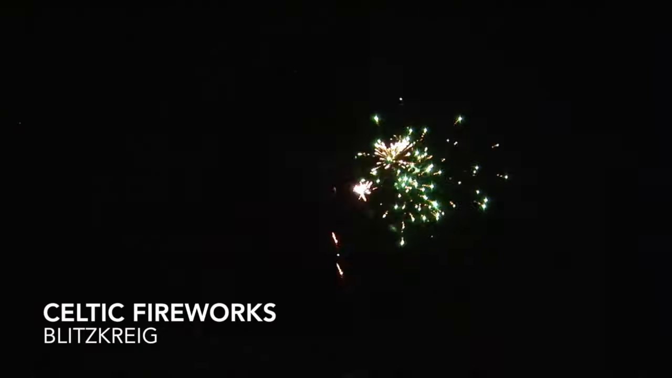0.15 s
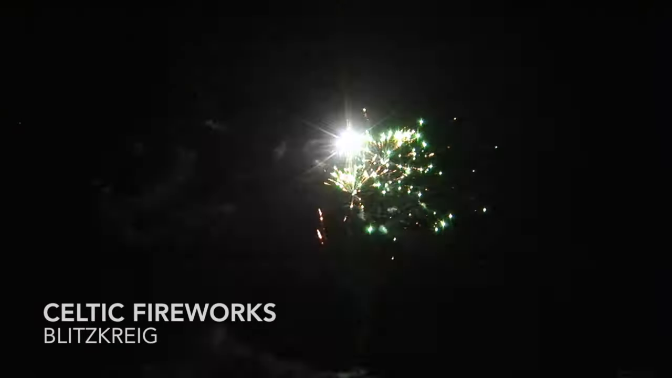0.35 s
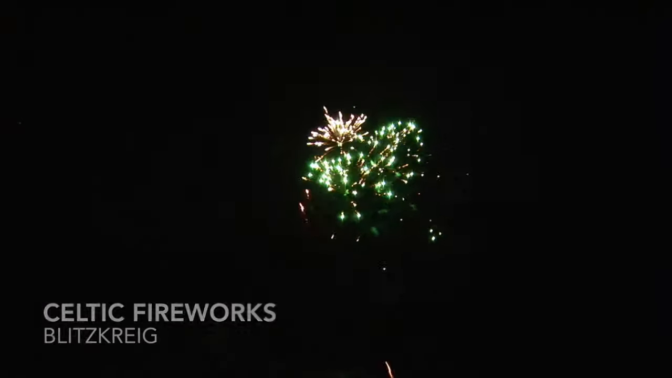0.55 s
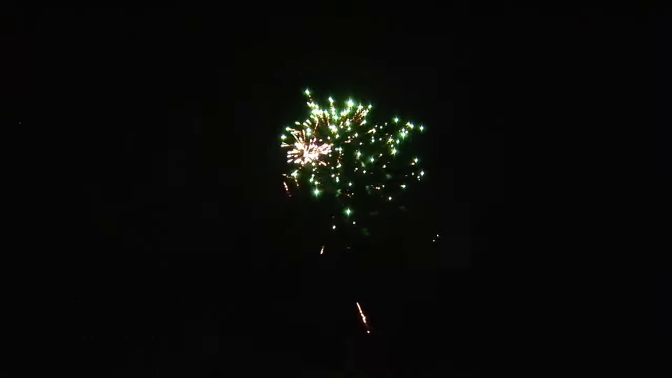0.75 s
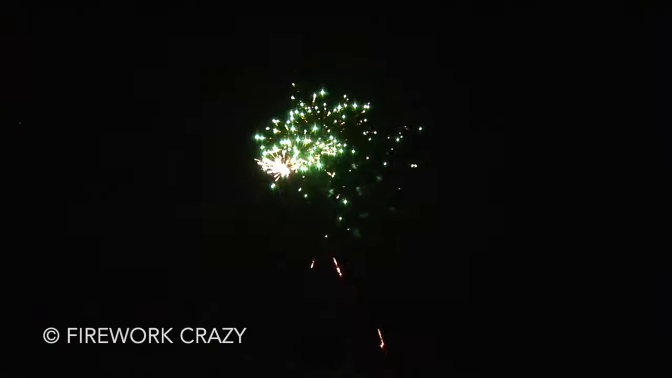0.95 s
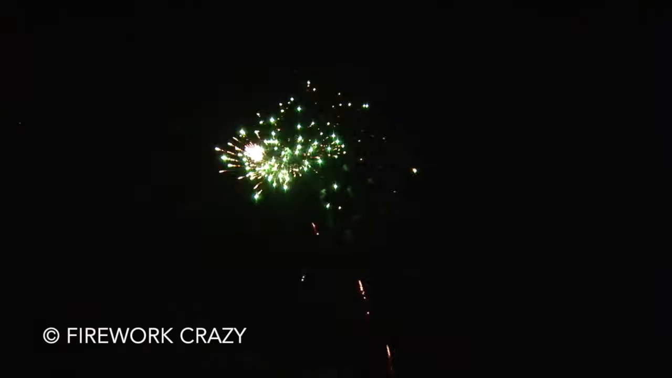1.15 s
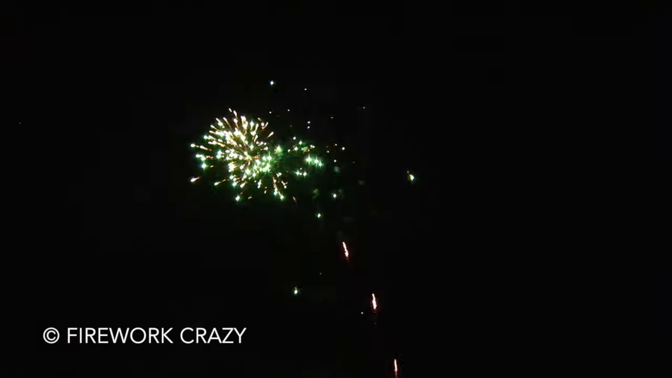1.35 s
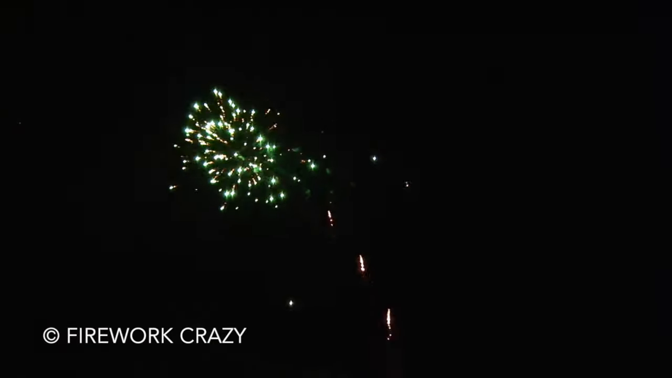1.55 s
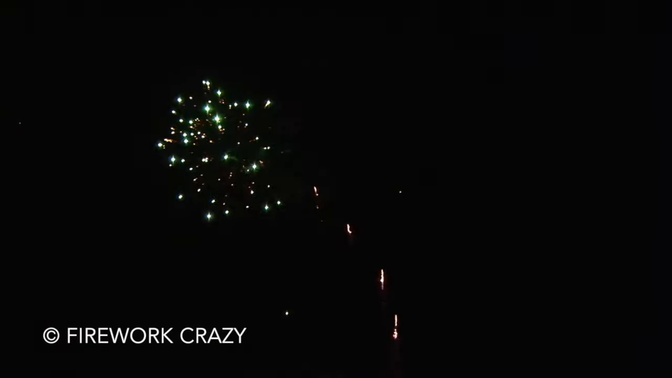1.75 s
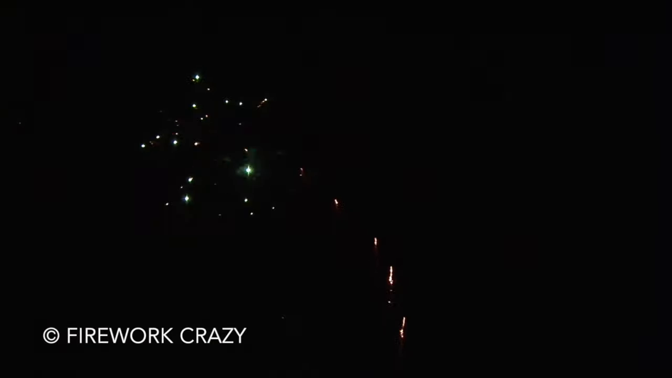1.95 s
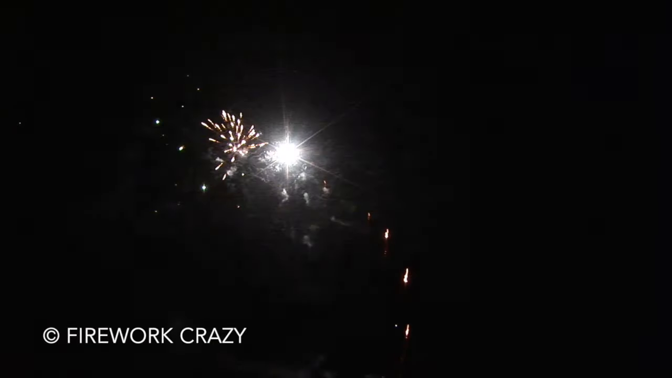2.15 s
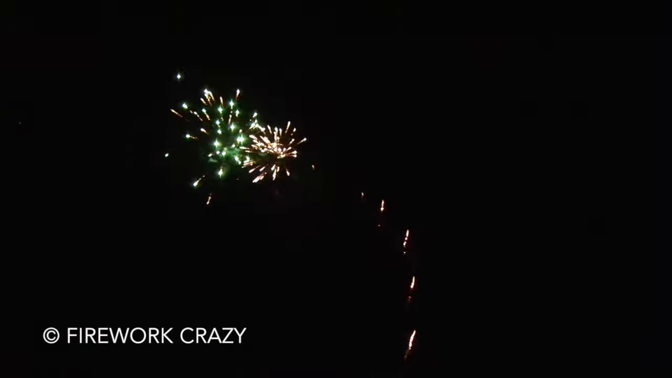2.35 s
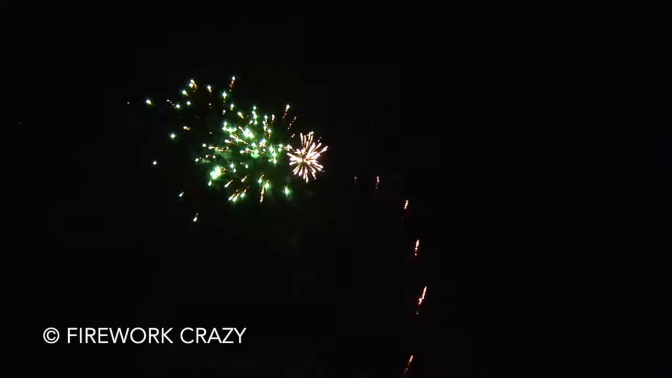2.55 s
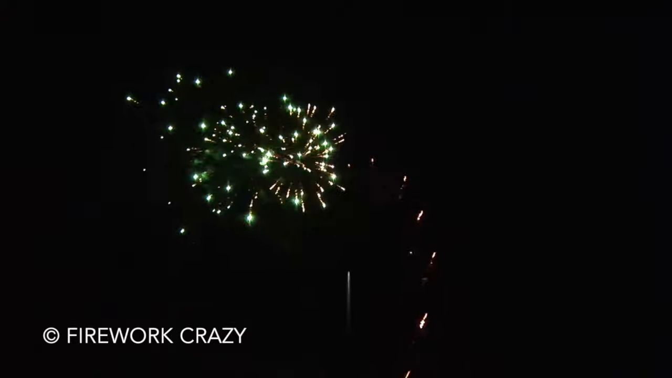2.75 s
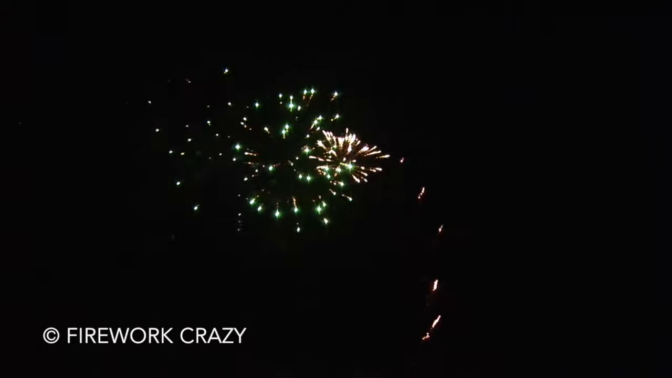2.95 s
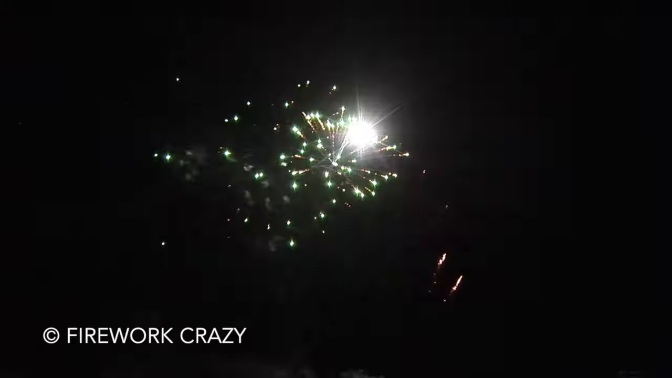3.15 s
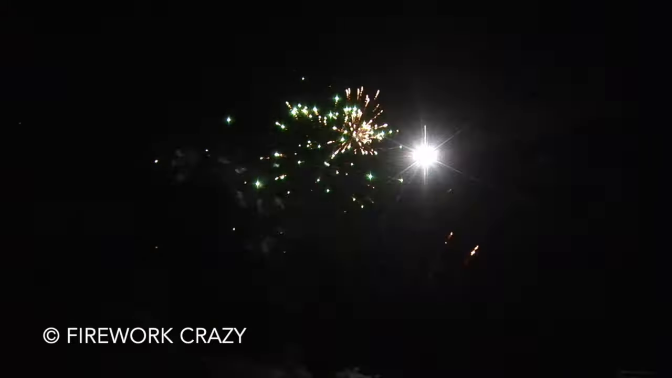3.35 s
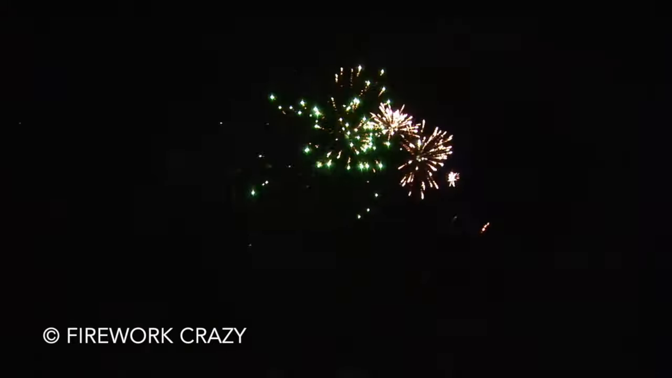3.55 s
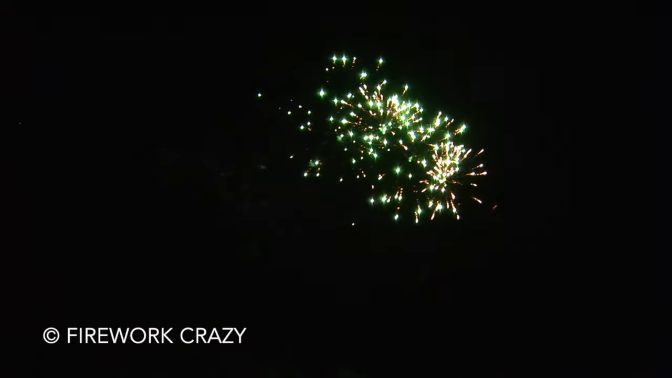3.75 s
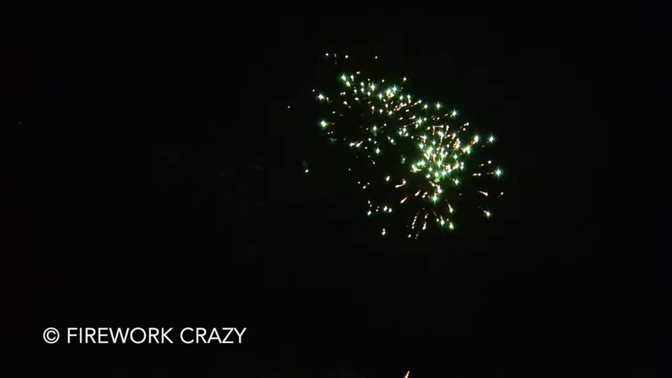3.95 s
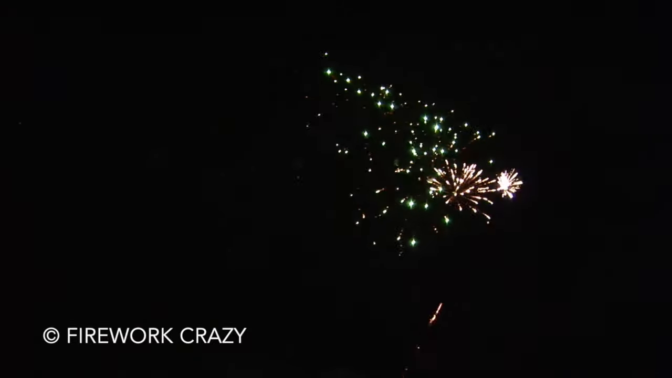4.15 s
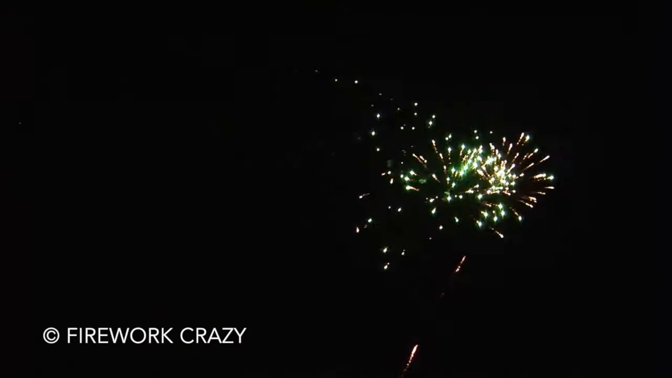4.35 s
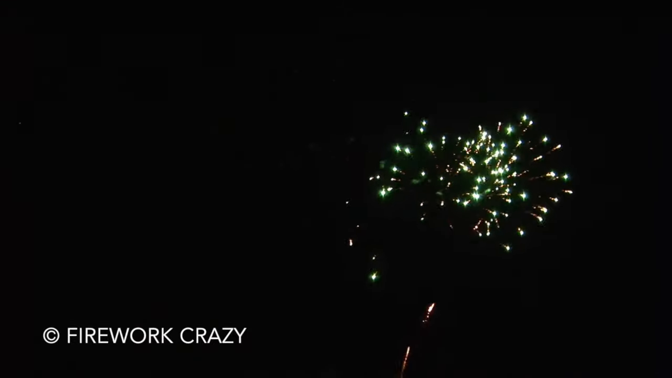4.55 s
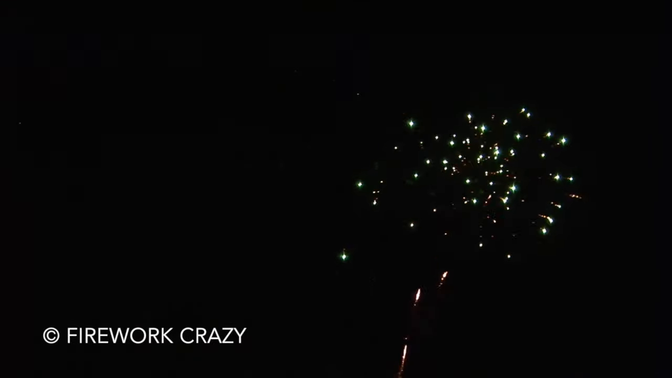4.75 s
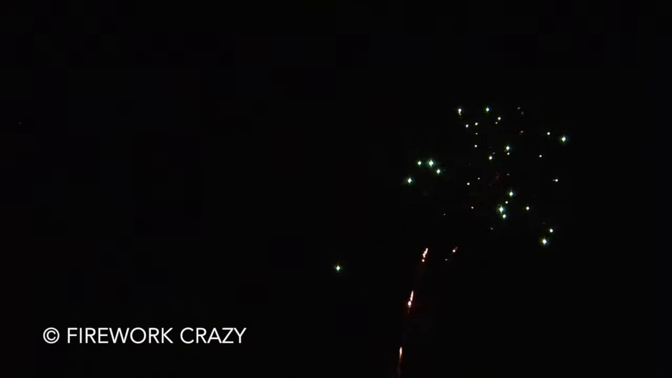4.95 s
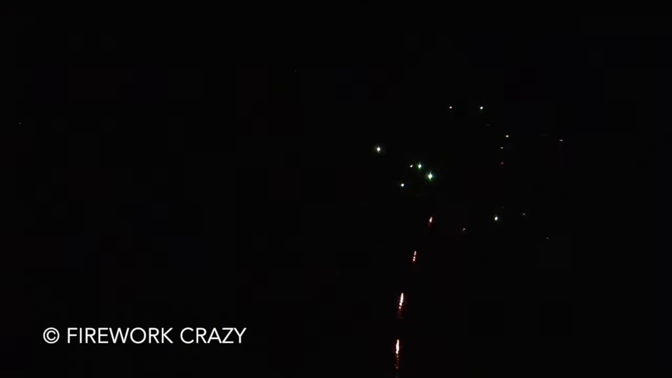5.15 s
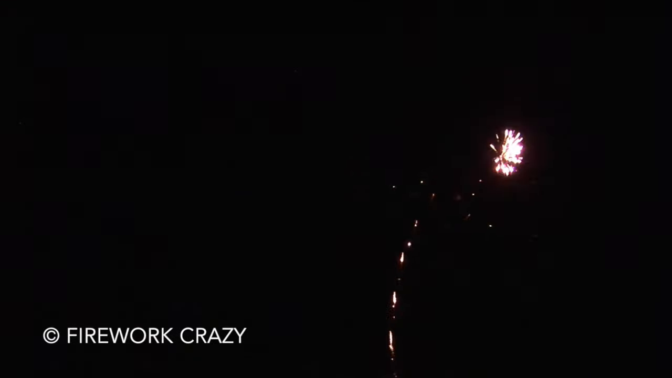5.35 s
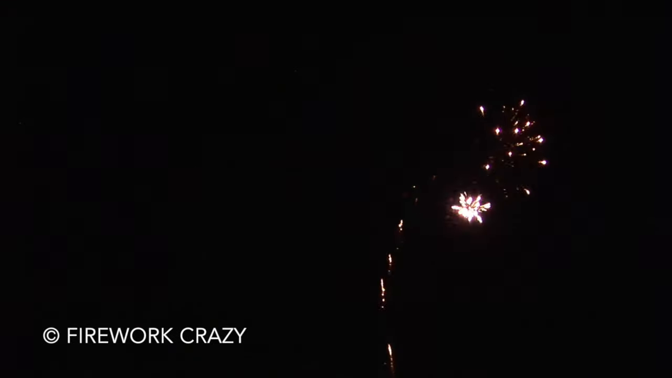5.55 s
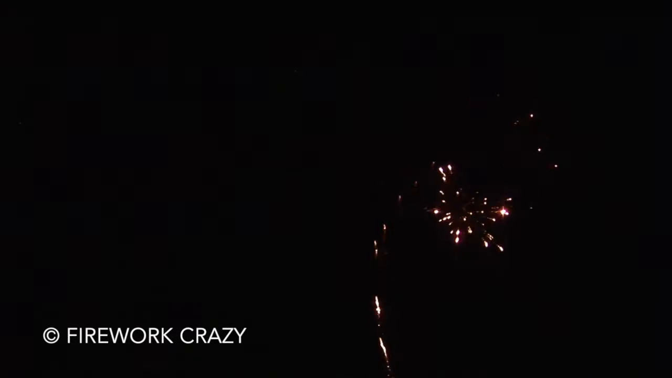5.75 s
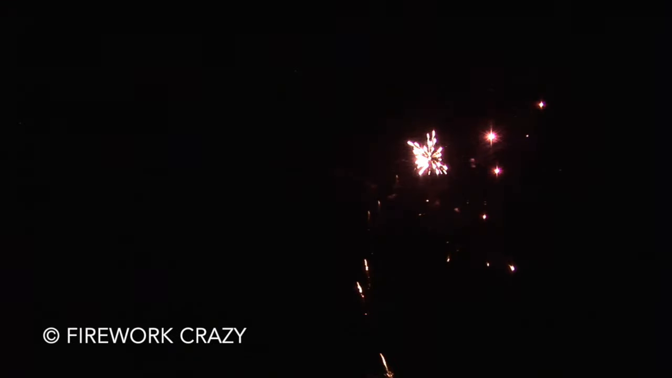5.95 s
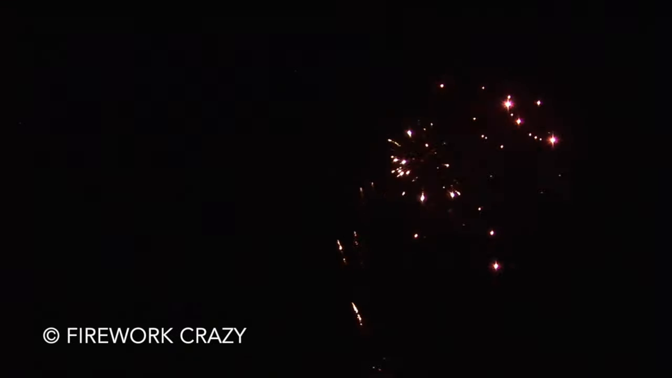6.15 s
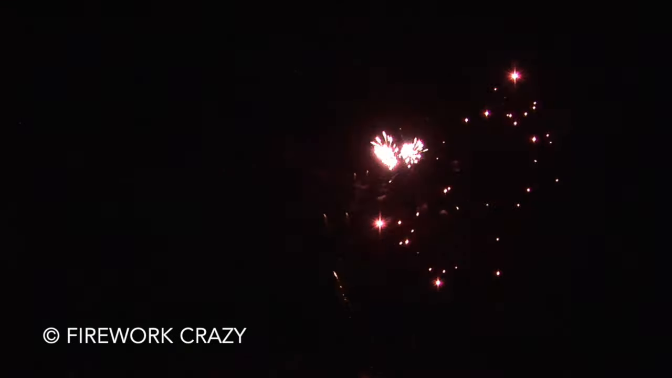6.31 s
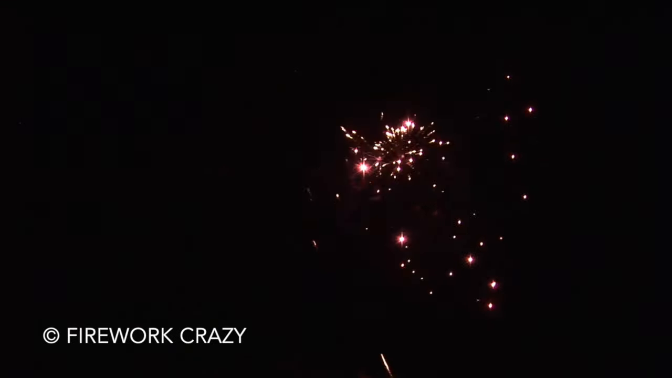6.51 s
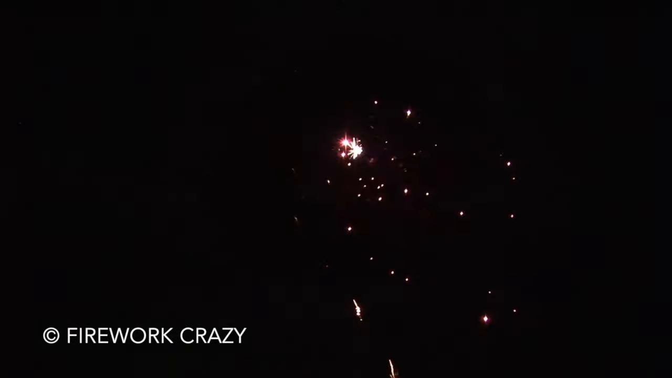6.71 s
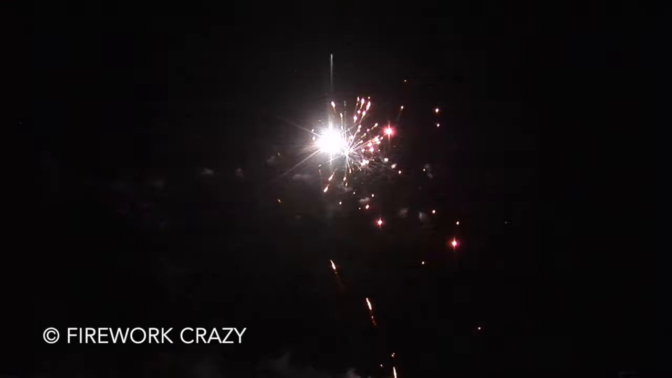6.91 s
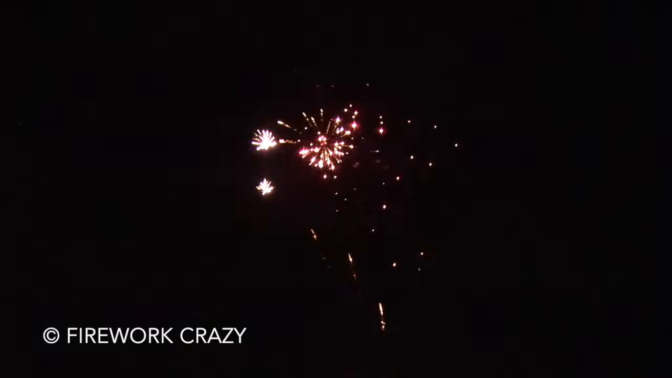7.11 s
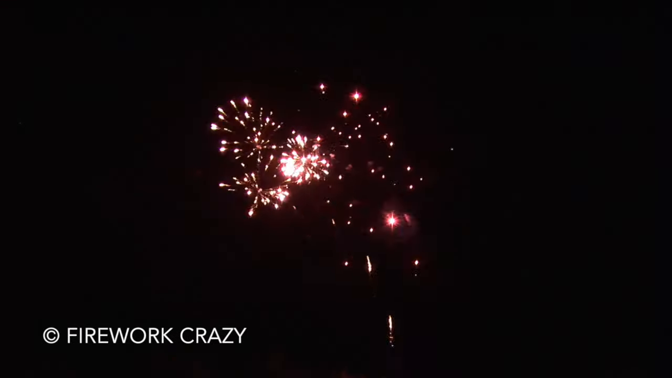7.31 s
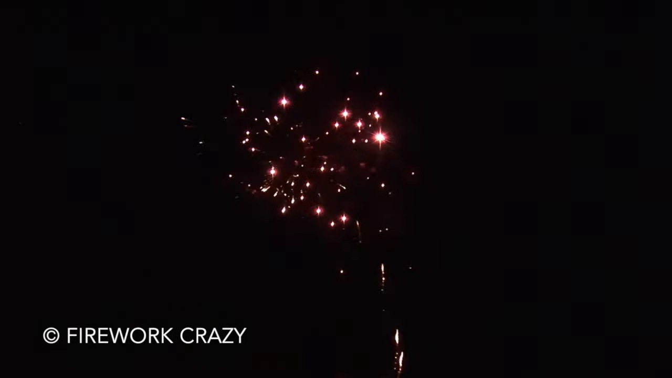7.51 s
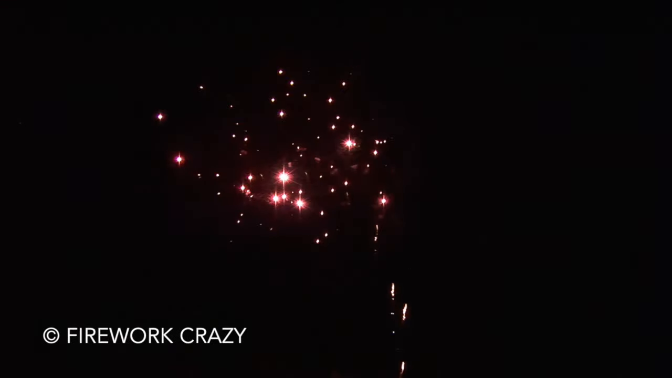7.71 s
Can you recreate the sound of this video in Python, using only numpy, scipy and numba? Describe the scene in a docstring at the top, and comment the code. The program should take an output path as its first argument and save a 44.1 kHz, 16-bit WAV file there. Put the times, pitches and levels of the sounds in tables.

```python
"""A firework barrage over an open field at night, entered while earlier echoes still ring and the wind is light.
Lift charges thump, blast waves that lose treble over the grass; shells burst overhead as sharper shocks heard twice,
straight and off the ground. The fan leans left by 2 s and right by 5 s, each bang starting tails of decaying noise.
Treble ticks come near 1.4 s, narrow noise puffs from 4 to 6 s; the wind noise rises unevenly to a last strong gust.
A microphone with two ports hears it all over faint hiss, its gain control ducking after bangs, its input clipping."""
import sys
import numpy as np
from scipy import signal
from scipy.fft import rfft, irfft, next_fast_len
from scipy.io import wavfile
from scipy.ndimage import uniform_filter1d, map_coordinates
from numba import njit

SR = 44100
rng = np.random.default_rng(int(sys.argv[2]) if len(sys.argv) > 2 else 0)


def bounce(signal):
    """Save signal as a 16-bit WAV file at the path given by the first command-line argument."""
    frames = np.transpose(np.atleast_2d(signal))
    limited = np.clip(frames, -1, 1)
    pcm = np.round(limited * 32767).astype(np.int16)
    wavfile.write(sys.argv[1], SR, pcm)


N = 347508
SPAN = 2048  # length of one blast [samples]

# Shell bursts: (time [s], level [dB], push [ms], ground bounce delay [ms], housing ring [dB])
SHELL_BURSTS = [(0.1233, 12.5, 0.67, 2.95, -11), (0.4206, 11.5, 0.6, 3.27, -6),
                (0.5193, 13.5, 0.49, 2.74, -9), (0.7617, 14, 0.6, 3.48, -7),
                (1.0198, 13.5, 0.51, 3.2, -1.5), (1.261, 17, 0.5, 3.04, -7), (1.5255, 14.5, 0.49, 3.2, -5),
                (2.394, 12, 0.56, 3.31, -29), (2.5792, 15, 0.62, 3.29, -5), (2.8773, 14.5, 0.65, 3.25, -1),
                (3.179, 14.5, 0.65, 3.22, -4), (3.57, 14.5, 0.53, 3.58, -11), (3.7834, 11.5, 0.78, 3.2, -3),
                (3.8525, 13.5, .57, 3.63, -9), (3.9499, 15, 0.68, 2.95, -6),
                (4.4071, 14.5, 0.56, 2.59, -11), (4.5326, 13, 0.83, 2.81, -5),
                (5.7019, 10.5, 0.67, 3.17, -2.5), (5.9045, 14, 0.51, 2.46, -5),
                (6.2829, 14, 0.59, 3.22, -4.5), (6.6489, 12.5, 0.52, 3.27, -6), (6.677, 12, 0.53, 3.31, -8),
                (7.1018, 13, 0.51, 3.18, -8.5), (7.3454, 12, 0.68, 3.31, -8.5),
                (7.485, 11.7, 0.66, 3.31, -12), (7.4891, 16, 0.4, 2.81, -8.5),
                (7.6145, 15, 0.64, 3.22, -9.5)]
# Lift charges and a few faint far pops: (time [s], level [dB], lower ring [dB], upper ring [dB])
LIFT_CHARGES = [(0.0904, -3, -9, -17.5), (0.8875, -5, 4, 18), (1.1768, -3, 5.5, 2.5), (1.4285, -1, 5, 1),
                (1.6658, -5, 14, -3.5), (1.9341, -4, 0, -10), (2.1482, -4.5, -1.5, -14.5),
                (2.3636, -7, 6, -0.5), (2.5638, -4.5, 4, 1.5), (2.8341, -5.5, -1, -19),
                (3.1033, -3.5, 4, 4.5), (4.3204, 0, -3, -13), (4.5985, -12.5, 4, -8),
                (4.8471, -3, -11, -19.5), (5.0398, -6.5, 2, 3), (5.2349, -7, 4, 4), (5.4029, -7.5, 4, 1.5),
                (5.5975, -5, -7.5, -17), (5.819, -10, -22, -2.5), (6.0203, -4.5, 3, -19),
                (6.2602, -3, -8, -4), (6.82, -5, -1.5, 1.5), (7.0488, -2.5, -6, 0), (7.2687, -2.5, 3.5, -9),
                (7.515, -13, 3, -5), (7.7316, -9, 5, 9), (7.8009, -7, 4.5, -3)]
# Cavities round the microphone: (frequency [Hz], width [Hz])
HOUSING_CAVITIES = [(2290, 520), (3050, 600), (4300, 1400)]
# Resonance of the camera's body, one row: (frequency [Hz], width [Hz])
CAMERA_BODY = (325, 90)
# Inequality of the two ports: (frequency [Hz], width [Hz], level before halving between the ports [dB])
PORT_INEQUALITY = [(720, 190, -5.5), (5680, 1100, 5.5)]
# Spectrum of the scatter close by: (frequency [Hz], relative density [dB per Hz])
NEAR_SPECTRUM = [(100, -60), (300, 14), (1000, 6), (2300, 6.5), (4000, -2.5), (6000, -11), (8000, -64),
                 (9500, -14), (13500, -21), (15500, -34)]
# Decay of the scatter close by: (frequency [Hz], time to fall 60 dB [s])
NEAR_DECAY = [(300, 0.093), (2000, 0.07), (6000, 0.085), (10000, 0.13)]
# Spectrum of the wash from trees and slopes: (frequency [Hz], relative density [dB per Hz])
FAR_SPECTRUM = [(100, -22), (300, 2.5), (800, -1), (1500, 0.5), (2350, -2.5), (2650, -4.5), (3800, -11),
                (4800, -14), (5800, -14), (6400, -40.5), (8500, -34.5), (10500, -17.5), (14500, -26.5),
                (16000, -64.5)]
# Decay of the wash: (frequency [Hz], time to fall 60 dB [s])
FAR_DECAY = [(300, 2.7), (2000, 1.95), (5000, 1.24), (10000, 0.75)]
# Left-right likeness of the echoes: (frequency [Hz], correlation [-1 to 1])
ECHO_LIKENESS = [(300, 0.1), (1400, 0.6), (3100, 0.9), (6000, 0.067), (15000, 0.11)]
# Wind buffeting ahead of the microphone's bass roll-off: (time [s], level [dB])
WIND_LEVEL = [(0, -31), (.35, -26), (0.621, -26.5), (.9, -22), (1.2, -23), (1.5, -21.5), (2.2, -24),
              (2.85, -28.5), (3.5, -18.5), (3.8, -21), (4.5, -15.5), (5.5, -19.5), (5.9, -21.5),
              (6.45, -17), (6.7, -21.5), (7.2, -20), (7.55, -24), (7.88, -13)]
# Spectrum of the buffeting: (frequency [Hz], relative density [dB per Hz])
BUFFET_SPECTRUM = [(15, -73), (30, -1), (60, 4), (130, -5), (250, -17.5), (500, -32), (1000, -33.5),
                   (2000, -100)]
# Brief swells of noise in a narrow band: (time [s], level [dB])
NOISE_PUFFS = [(4.16, -38), (4.61, -41), (5.1, -48.5), (6.11, -43)]
# Thin treble ticks close by: (time [s], level [dB])
TREBLE_TICKS = [(1.4314, -18.5), (1.473, -33)]
# Spectrum of the recorder's noise: (frequency [Hz], relative density [dB per Hz])
HISS_SPECTRUM = [(3000, -22), (6000, -4), (10000, 11.5), (14000, -4), (15500, -34)]

# The left port lags by middle + swing * cosine: lags [us], period [s], moment of the greatest lag [s]
SWEEP_MID_US, SWEEP_US, SWEEP_S, SWEEP_PEAK_S = 12.4, 44.3, 6.42, 5.22
# Burst rings: second cavity relative to the ring of the row, third cavity absolute
UPPER_RING_DB, TOP_RING_DB = -6, -9
# Copy off the camera: mean delay, level at a 0 dB ring, growth [dB per dB of ring]
COPY_MS, COPY_DB, COPY_GROWS = 0.3823, 4.5, 1.6
COPY_SCATTER_MS = 0.06  # spread of the copy delays, bursts and lift charges alike
# Ground copy: level, its push as a share of the direct push, rings relative to the direct rings
BOUNCE_DB, BOUNCE_SHORTER, BOUNCE_RING_DB = -2, 0.81, -1.5
SPRAY_DB = -32  # scatter of the bursts, at its start
LIFT_PUSH_MS, LIFT_TOP_RING_DB, LIFT_BOOM_DB = 0.78, -10, -3  # the boom is a mean
LIFT_COPY_MS, LIFT_COPY_DB = 0.3, -7.5  # mean delay; level at a 0 dB upper ring
SLAP_MS, SLAP_DB = 9.4, -21.5  # upper mids sent back by something near the tubes; mean delay
LIFT_SIDE = 0.5  # how far aside the tubes stand, as a share of the swing
WIND_SHARED = 0.12  # share of each port's buffeting that is added to the other
LUMP_DB = 3  # depth of the wind's lumps, per unit of the random curve
TOP_HZ = 16400  # band limit of the recorder


def amp(db):
    """Level definition: decibels to an amplitude ratio."""
    return 10 ** (np.asarray(db) / 20)


def unit(x):
    """Normalisation to a root mean square of one."""
    return x / np.sqrt(np.mean(x ** 2) + 1e-20)


def along(points, hz):
    """Linear interpolation of (frequency, value) points on a log-frequency axis."""
    f, v = np.transpose(points)
    return np.interp(np.log(hz + 1), np.log(f + 1), v)


def wobble(rate):
    """Spline interpolation of random knots, rate of them a second."""
    knots = rng.standard_normal(int(N * rate / SR) + 4)
    return map_coordinates(knots, [np.arange(N) * rate / SR])


def filtered(x, response):
    """Linear filtering: the spectrum of x times a complex response of frequency."""
    m = next_fast_len(N + SR // 2)
    return irfft(rfft(x, m) * response(np.fft.rfftfreq(m, 1 / SR)), m)[..., :N]


def resonance(f, hz, width_hz):
    """Damped resonance: a second-order band-pass, of gain one at its centre."""
    return 1j * f * width_hz / (hz * hz - f * f + 1j * f * width_hz)


def late(f, seconds):
    """Propagation delay: a phase that grows with frequency."""
    return np.exp(-2j * np.pi * f * seconds)


def add(out, s, spectrum):
    """Superposition: one short stereo sound joins the others at its moment."""
    at = int(s * SR) - 16
    f = np.fft.rfftfreq(SPAN, 1 / SR)
    out[:, at:at + SPAN] += irfft(spectrum * late(f, s - at / SR), SPAN)


def shock(f, push_ms, front_hz, rings_db, boom_db):
    """Blast wave (1 - u) exp(-u) with a rounded front, exciting the resonances of housing and body."""
    turn = 2j * np.pi * f * push_ms / 1000
    blast = SR * push_ms / 1000 * turn / (1 + turn) ** 2
    blast = blast / (1 + 1j * f / front_hz) ** 2
    # each port hears the cavities a little differently
    rings = amp(np.minimum(rings_db, 9) + rng.normal(0, 0.5, (2, 3)))
    cavities = np.array([3 * resonance(f, hz, width) for hz, width in HOUSING_CAVITIES])
    boom = 1 + 3 * amp(boom_db) * resonance(f, *CAMERA_BODY)
    return blast * boom * (1 + rings @ cavities)


def doubled(f, delay_ms, db, bass_hz):
    """Reflection off a small surface: only the short waves return, never stronger than they came."""
    short_waves = 1j * f / (bass_hz + 1j * f)
    return 1 + min(amp(db), 1) * late(f, delay_ms / 1000) * short_waves


def scatter(f, level_db, t60, bass_hz):
    """Scattering off turf, tripod and uneven air: a quick spray of copies, mostly shared by the ports."""
    t = np.arange(SPAN) / SR
    shared, own = rng.standard_normal(SPAN), rng.standard_normal((2, SPAN))
    envelope = amp(level_db - 60 * t / t60) * (1 - np.exp(-t / 0.000047))
    spray = (shared + 0.08 * own) * envelope
    return 1 + rfft(spray) * 1j * f / (bass_hz + 1j * f)


def unequal(f, side):
    """Directional response: round a few frequencies one port gains what the other loses, more so further aside."""
    difference = sum(amp(db) * resonance(f, hz, width) for hz, width, db in PORT_INEQUALITY)
    return 1 + np.array([[side], [-side]]) * difference / 2


def bursts():
    """Image source: a direct shock, then its duller copy off the ground, at two ports a small lag apart."""
    out, f = np.zeros((2, N + SPAN)), np.fft.rfftfreq(SPAN, 1 / SR)
    for s, db, push_ms, bounce_ms, ring_db in SHELL_BURSTS:
        rings_db = np.array([ring_db, ring_db + UPPER_RING_DB, TOP_RING_DB])
        direct = shock(f, push_ms, 12000, rings_db, boom_db=-33.0)
        copy_ms = COPY_MS + COPY_SCATTER_MS * rng.normal()
        # the copy is stronger from directions that ring the housing
        direct = direct * doubled(f, copy_ms, COPY_DB + COPY_GROWS * ring_db, bass_hz=1370)
        # a blast along the ground shakes the body more
        ground = shock(f, BOUNCE_SHORTER * push_ms, 4000, rings_db + BOUNCE_RING_DB, boom_db=-18.5)
        ground = amp(BOUNCE_DB) * late(f, bounce_ms / 1000) * ground
        lag_us = SWEEP_MID_US + SWEEP_US * np.cos(2 * np.pi * (s - SWEEP_PEAK_S) / SWEEP_S)
        side = late(f, np.array([[0.5], [-0.5]]) * lag_us / 1e6) * unequal(f, lag_us / SWEEP_US)
        spray = scatter(f, SPRAY_DB, t60=0.015, bass_hz=700)
        add(out, s, amp(db) * (direct + ground) * side * spray)
    return out[:, :N]


def launches():
    """Ground attenuation: a softer blast that skims the grass and loses its treble."""
    out, f = np.zeros((2, N + SPAN)), np.fft.rfftfreq(SPAN, 1 / SR)
    grass = 1 / (1 + 1.3j * f / 5000 - (f / 5000) ** 2) ** 2
    for s, db, low_db, high_db in LIFT_CHARGES:
        boom_db = LIFT_BOOM_DB + rng.normal(0, 2.3)
        blast = shock(f, LIFT_PUSH_MS, 3800, [low_db, high_db, LIFT_TOP_RING_DB], boom_db)
        copy_ms = LIFT_COPY_MS + COPY_SCATTER_MS * rng.normal()
        blast = blast * doubled(f, copy_ms, LIFT_COPY_DB + high_db, bass_hz=1000)
        slap_s = SLAP_MS / 1000 + rng.normal(0, 0.00069)
        slap = 1 + amp(SLAP_DB) * late(f, slap_s) * resonance(f, 2800, 1500)
        blast = blast * unequal(f, LIFT_SIDE) * slap
        add(out, s, amp(db) * grass * blast * scatter(f, level_db=-16, t60=0.011, bass_hz=676))
    return out[:, :N]


def echoes(spectrum, t60, level_db, delay, rise, launch_db, grain_db):
    """Diffuse reverberation: the powers of all tails add, and each frequency decays at its own rate."""
    hz, t, noise = signal.stft(rng.standard_normal((2, N)), SR, nperseg=256)
    power = np.zeros(noise.shape[1:])
    dull_db = launch_db - 10 * np.log10(1 + (hz[:, None] / 5000) ** 6)  # lift charges carry little treble
    bangs = [row[:2] for row in SHELL_BURSTS]
    bangs += [(row[0], row[1] + dull_db) for row in LIFT_CHARGES]
    bangs += [(-0.066, 5.8), (-0.28, 4.3)]  # the barrage is already under way
    decay_s = along(t60, hz)[:, None]
    for s, db in bangs:
        age = t[t > s + delay] - s - delay
        tail = amp(2 * (db - 60 * age / decay_s)) * (1 - np.exp(-age / rise))
        power[:, len(t) - len(age):] += tail

    def grain(bands, frames):
        rough = rng.standard_normal(power.shape)
        return unit(uniform_filter1d(uniform_filter1d(rough, size=bands, axis=0), size=frames, axis=1))

    power *= amp(2 * grain_db * grain(15, 3))  # single reflectors stand out for a few ms
    power *= amp(2 * 1.5 * grain(5, 30))  # banks of trees answer in slower swells
    # the mix of mid and side sets how alike the ports are
    turn = np.arccos(np.clip(along(ECHO_LIKENESS, hz), -1, 1))[:, None] / 2
    colour = amp(along(spectrum, hz) + level_db)[:, None]
    mid, side = noise * np.sqrt(power) * colour * [np.cos(turn), np.sin(turn)]
    return signal.istft(np.array([mid + side, mid - side]), SR, nperseg=256)[1][:, :N]


def wind():
    """Turbulent pressure: low, lumpy buffeting mostly unrelated between ports; stronger gusts reach higher."""
    s, db = np.transpose(WIND_LEVEL)
    level_db = np.interp(np.arange(N) / SR, s, db)
    rumble = filtered(rng.standard_normal((2, N)), lambda hz: amp(along(BUFFET_SPECTRUM, hz)))
    rumble = rumble + WIND_SHARED * rumble[::-1]
    lumps = amp(LUMP_DB * np.array([wobble(10), wobble(11)]))
    flutter = filtered(rng.standard_normal((2, N)), lambda hz: resonance(hz + 1, 136, 100) ** 2)
    flutter_db = 2 * (level_db + 18.5) - 38.5  # rises twice as fast as the rumble
    return amp(level_db) * unit(lumps * rumble) + amp(flutter_db) * unit(lumps * flutter)


def small_sounds():
    """Filtered noise under envelopes: narrow puffs, thin treble ticks and a steady hiss."""
    t = np.arange(N) / SR
    narrow = unit(filtered(rng.standard_normal(N), lambda hz: resonance(hz + 1, 2393, 90) ** 2))
    thin = unit(filtered(rng.standard_normal((2, N)), lambda hz: resonance(hz + 1, 16300, 6000) ** 2))
    hiss = unit(filtered(rng.standard_normal((2, N)), lambda hz: amp(along(HISS_SPECTRUM, hz))))
    puffs = sum(amp(db) * np.exp(-((t - s) / 0.031) ** 2) for s, db in NOISE_PUFFS)
    ticks = sum(amp(db) * np.exp(-((t - s) / 0.00069) ** 2) for s, db in TREBLE_TICKS)
    return puffs * narrow + ticks * thin + amp(-74) * hiss


def scene():
    """Superposition of the blasts, their near and far echoes, the wind and the small sounds."""
    near = echoes(NEAR_SPECTRUM, NEAR_DECAY, level_db=-27, delay=0.0017, rise=0.00074,
                  launch_db=7.5, grain_db=2.5)
    far = echoes(FAR_SPECTRUM, FAR_DECAY, level_db=-35.0, delay=0.01, rise=0.053,
                 launch_db=7.5, grain_db=1.0)
    return bursts() + launches() + near + far + wind() + small_sounds()


@njit
def follow(level, up, down):
    """Envelope detection: a meter that rises fast and falls slowly."""
    held, out = 0., np.empty_like(level)
    for i in range(len(level)):
        held += (up if level[i] > held else down) * (level[i] - held)
        out[i] = held
    return out


def record(dry):
    """Dynamic compression and saturation: bass roll-off, late gain control, clipping, then the band limit."""
    mic = filtered(dry, lambda hz: (1j * hz / (90 + 1j * hz)) ** 2)
    meter = follow(np.abs(mic).max(axis=0), 1 / (0.0069 * SR), 1 / (0.2 * SR))
    meter = np.pad(meter, (int(0.004 * SR), 0))[:N]  # too late for the first wave and its bounce
    ducked = mic / (1 + meter / amp(-16)) ** 0.8
    clipped = ducked / (1 + np.abs(ducked) ** 12) ** (1 / 12)  # approaches full scale
    limited = filtered(clipped, lambda hz: 1 / (1 + (hz / TOP_HZ) ** 60) * (hz < TOP_HZ + 230))
    return np.clip(limited, -1.05, 1.05)


dry = scene()
out = record(dry)
bounce(out)
```